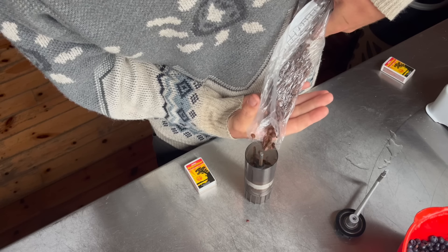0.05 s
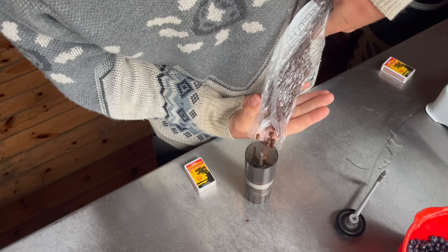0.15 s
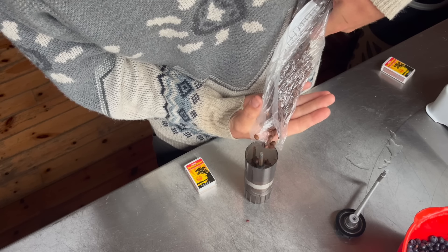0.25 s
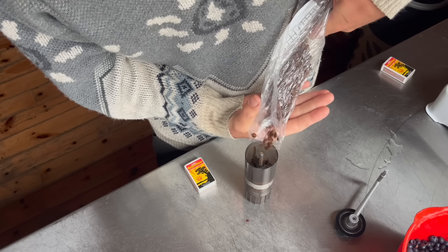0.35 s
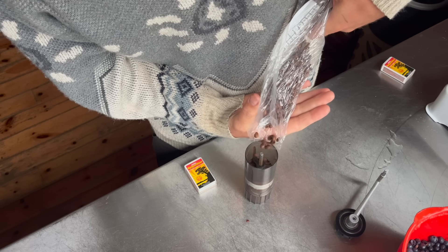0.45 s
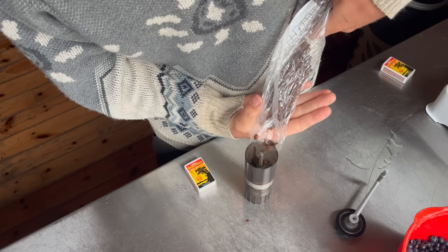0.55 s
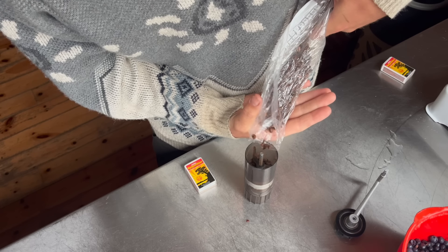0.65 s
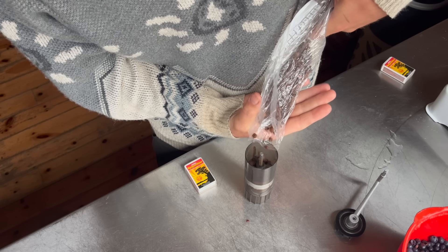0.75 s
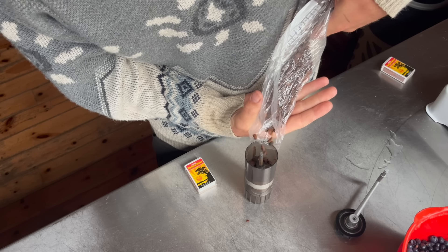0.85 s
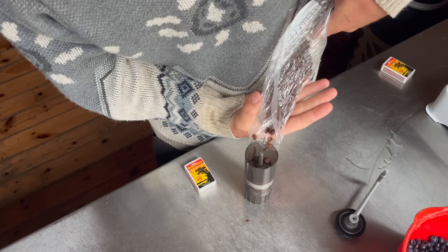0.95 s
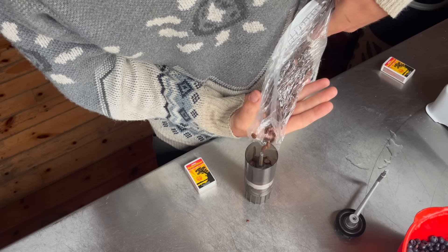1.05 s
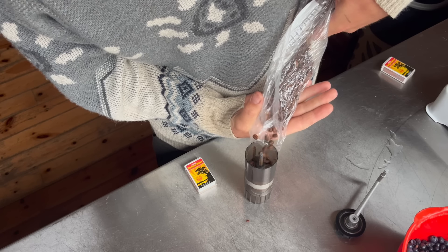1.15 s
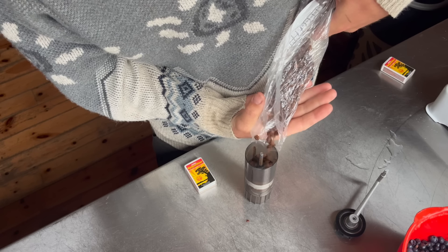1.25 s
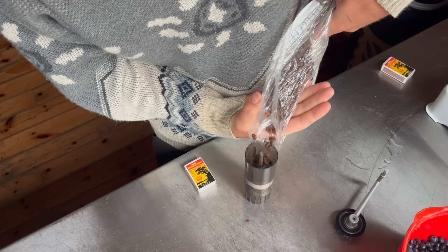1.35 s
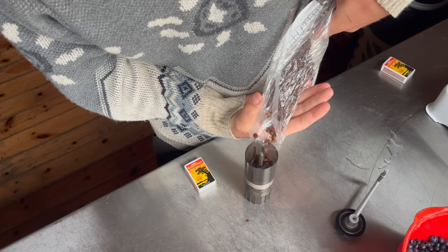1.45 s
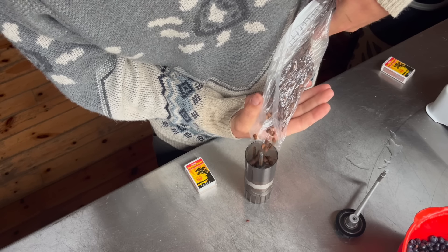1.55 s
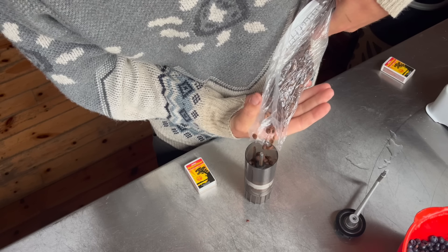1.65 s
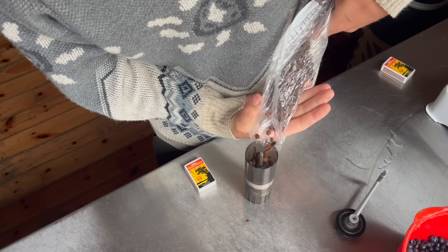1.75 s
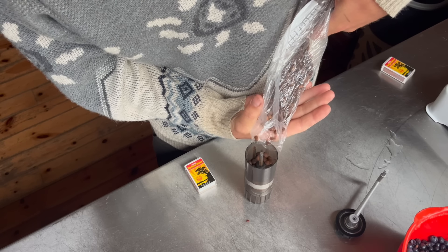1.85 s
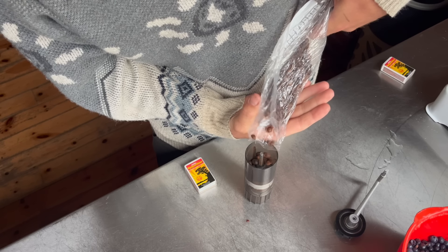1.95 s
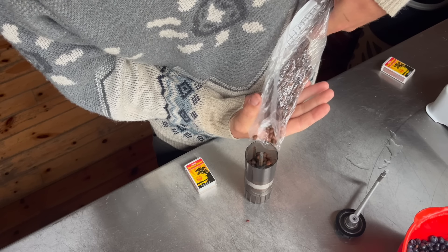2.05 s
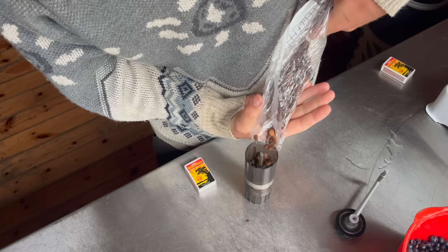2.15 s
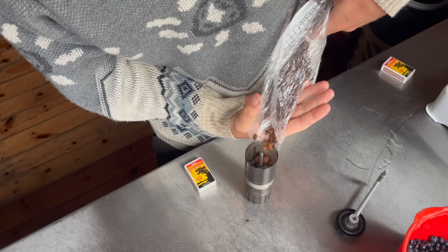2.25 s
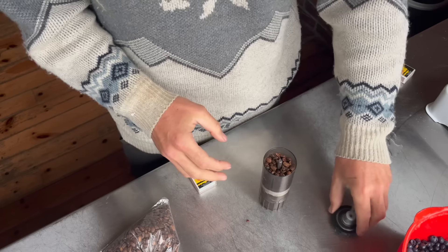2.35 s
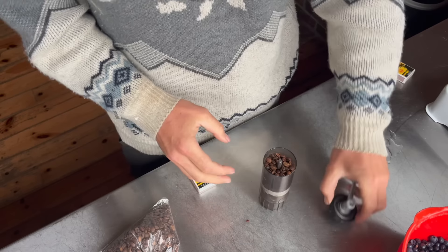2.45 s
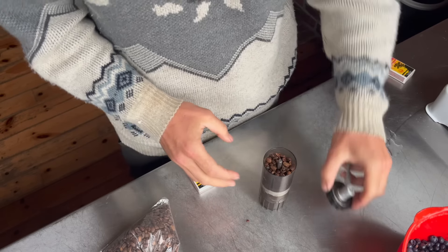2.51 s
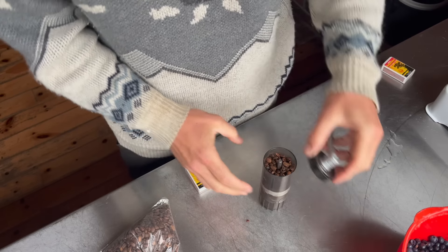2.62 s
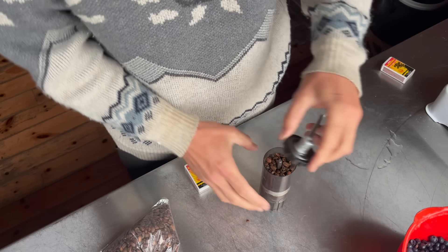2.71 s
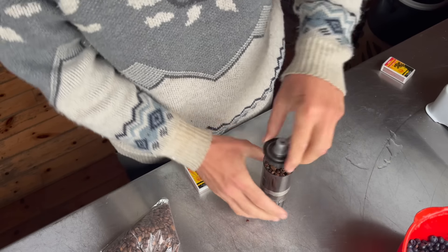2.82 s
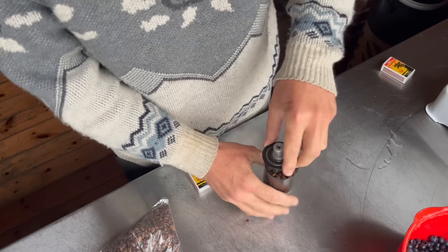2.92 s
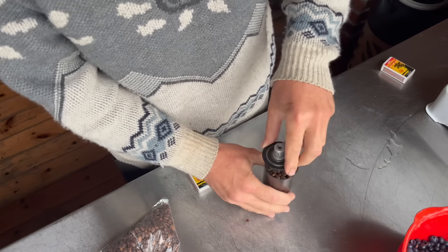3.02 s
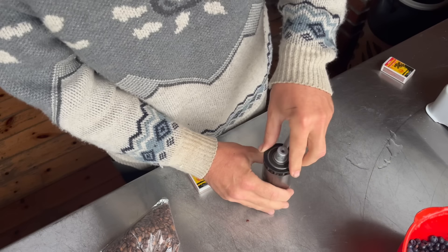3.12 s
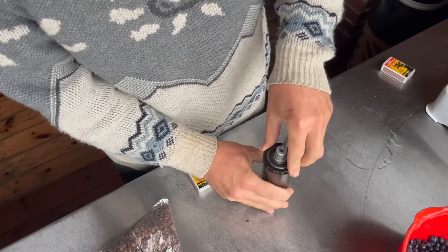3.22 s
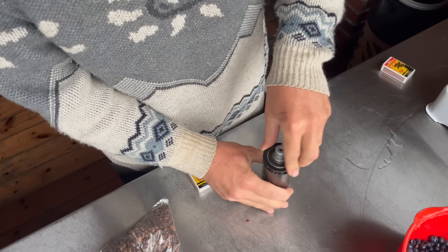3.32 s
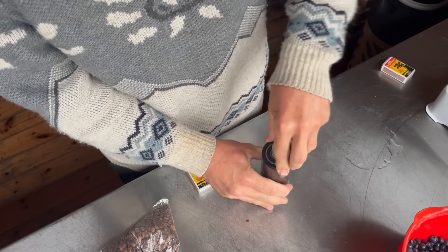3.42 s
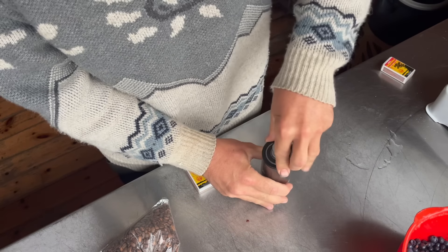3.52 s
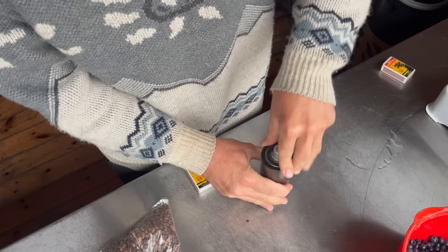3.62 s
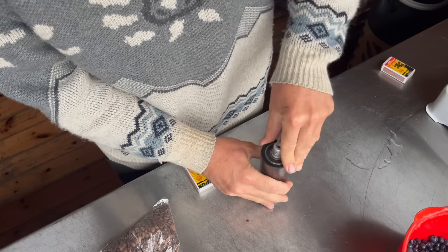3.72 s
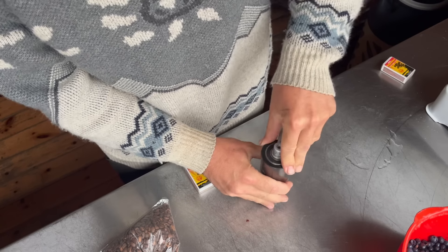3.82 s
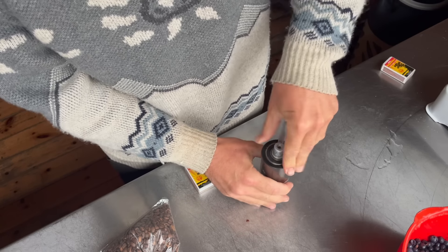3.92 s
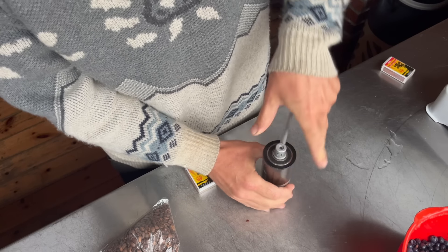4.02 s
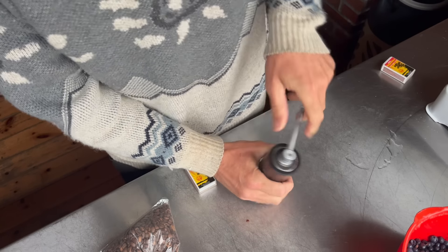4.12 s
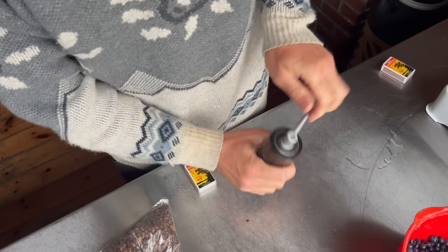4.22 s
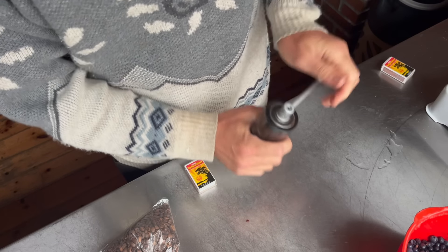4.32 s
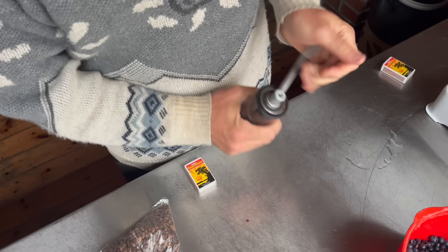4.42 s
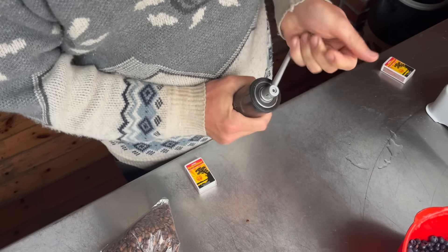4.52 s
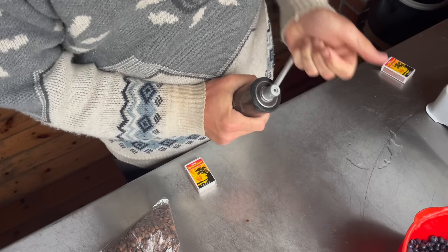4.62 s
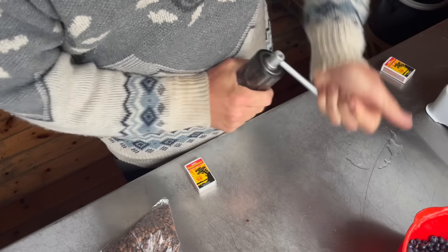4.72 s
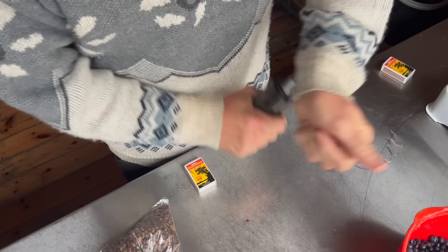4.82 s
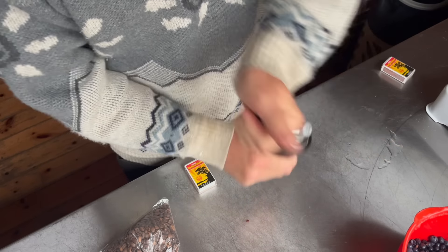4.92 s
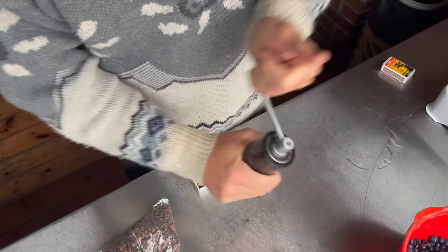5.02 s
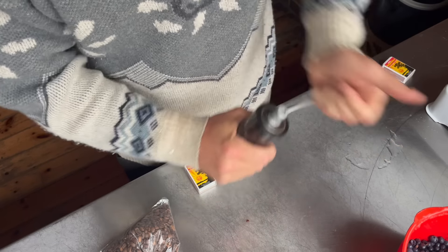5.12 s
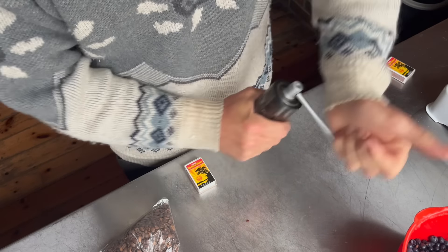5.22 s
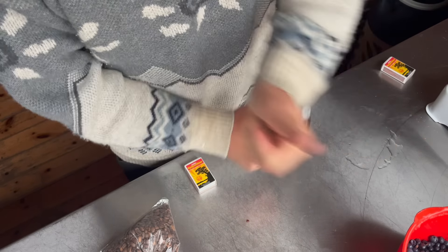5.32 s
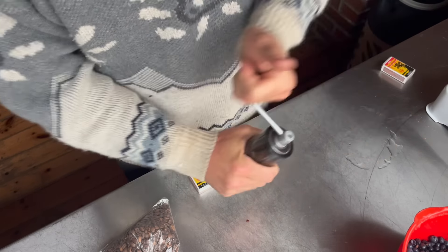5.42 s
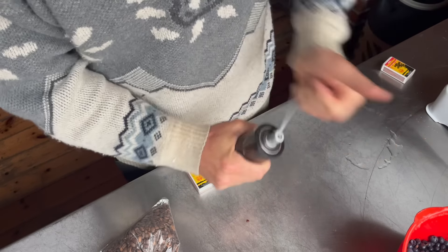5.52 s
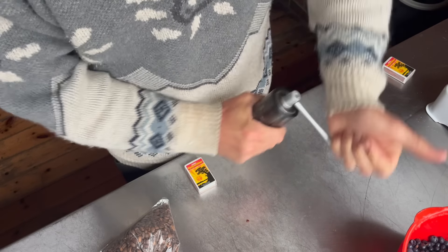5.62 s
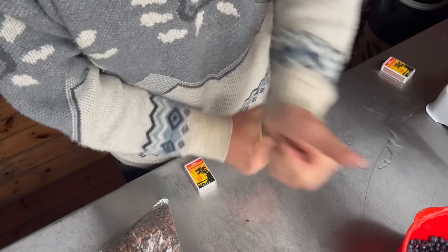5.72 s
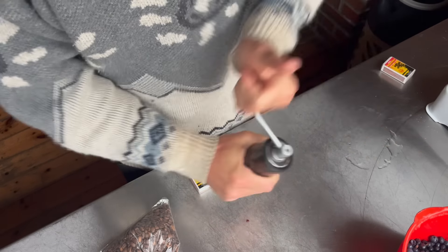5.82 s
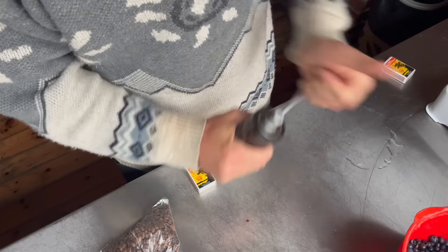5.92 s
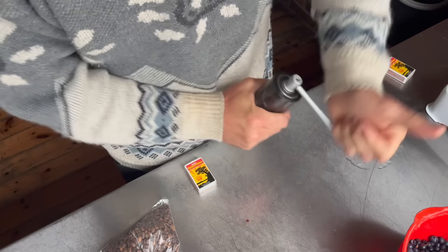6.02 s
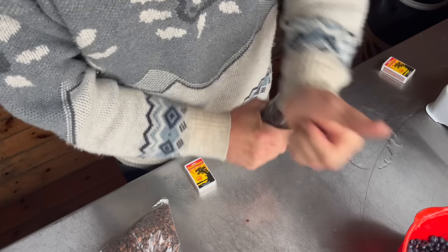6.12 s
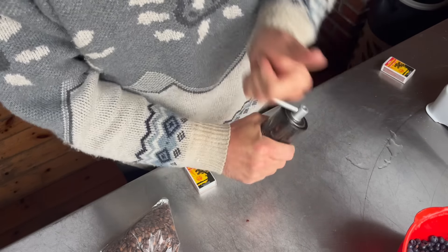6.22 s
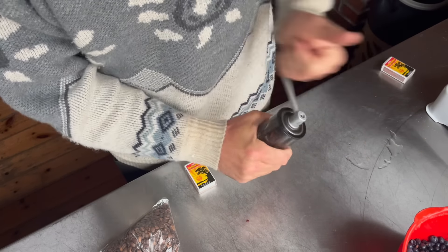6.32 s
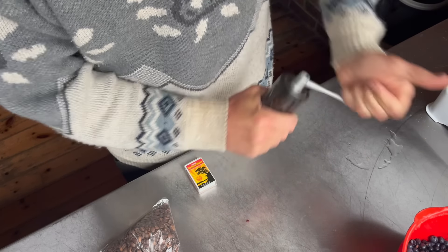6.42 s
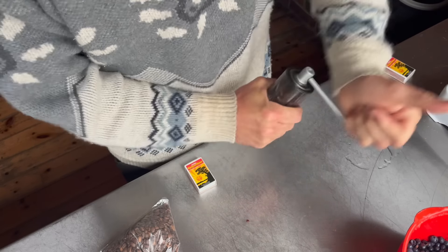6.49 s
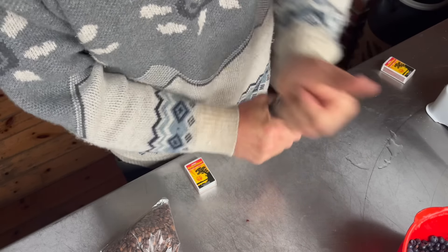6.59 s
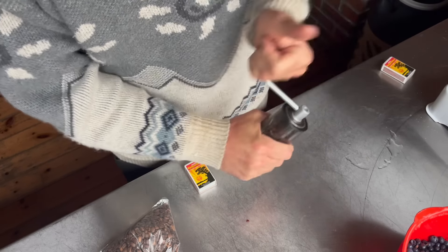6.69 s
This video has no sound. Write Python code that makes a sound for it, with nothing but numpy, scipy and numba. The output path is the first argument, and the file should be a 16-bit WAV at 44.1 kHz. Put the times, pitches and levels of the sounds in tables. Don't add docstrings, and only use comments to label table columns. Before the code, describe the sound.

Close stereo pickup of coffee preparation: dry beans patter and click into a thin metal cylinder, thinning to stray ticks under faint plastic rustle. Then steel taps and hollow thuds as a lid is pressed home over a resonant counter, followed by small clicks of the crank fitting. Finally the crank turns, burrs grinding with gritty rasp, snapping husks and mid-pitched cracks. Faint low room hum and slight hiss throughout.

```python
import sys
import numpy as np
from scipy import signal
from scipy.fft import rfft, irfft
from scipy.io import wavfile
from numba import njit

SR = 44100
rng = np.random.default_rng(int(sys.argv[2]) if len(sys.argv) > 2 else 0)


def digitize_waveform(pressure):
    field = np.atleast_2d(pressure).T
    bounded = np.clip(field, -1, 1)
    quanta = np.round(bounded * 32767).astype(np.int16)
    wavfile.write(sys.argv[1], SR, quanta)


def convert_level_to_amplitude(level_db):
    exponent = np.asarray(level_db, float) / 20
    return 10 ** exponent


N = 297675
T = np.arange(N) / SR
POUR_END_S, GRIND_START_S = 2.362, 4.585

# f/Hz, level/dB per Hz
HUM = [(25, -12), (45, 4.5), (60, -0.5), (110, -2), (170, -14.5), (300, -13), (600, -26.5), (1250, -20),
       (2400, -31.5), (4500, -32.5), (6500, -36), (9500, -37), (12500, -38), (15500, -43)]
HUM_DB = -59.5
# f/Hz, level below the hum/dB
WHINE = [(9900, -30), (4400, -27.5), (5370, -44)]
# f/Hz, t60/s
ROOM = [(150, 0.35), (500, 0.28), (1500, 0.32), (4000, 0.28), (10000, 0.2)]
# f/Hz, level/dB
PORTS = [(60, -17.5), (200, -11.5), (800, -1.5), (1700, -3.5), (2150, -13), (3000, -6), (5000, -4),
         (6700, 5), (8200, -9.5), (9100, -12.5), (10300, -8), (11600, 4), (12900, 17), (14400, -3.5),
         (15600, -15)]
# f/Hz, level/dB
COUNTER_PAN = [(60, -3.5), (110, -3), (200, -8.5), (380, -2.5), (700, -1.5), (1290, -0.5), (2380, 0.0),
               (4400, 3.5), (8120, -0.5), (15000, 0.5)]
# f/Hz, level/dB
HAND_PAN = [(60, -2.5), (110, -3), (200, -2.0), (380, -1), (700, -2), (1290, -1), (2380, 0), (4400, 2),
            (8120, -0.5), (15000, 0)]

# t/s, level/dB
FLOW = [
    (0.0, -48.5),
    (.23, -60),
    (.85, -57.5),
    (.95, -62),
    (1.08, -57.5),
    (1.14, -51),
    (1.55, -63),
    (1.75, -59),
    (2.36, -55.5),
]
# t/s, peak/dB, bean note f/Hz, tube note/dB, wall knock/dB
EARLY_BEANS = [(0.0218, -29, 10200, -47.5, -58), (0.0289, -28.5, 8360, -49, -59),
               (0.0759, -37, 9880, -47, -55), (0.0979, -33, 9240, -54, -52), (0.1054, -42, 9000, -49, -52),
               (0.1349, -34.5, 8050, -57, -62), (0.162, -34, 10100, -57, -59),
               (0.1924, -40, 8480, -63, -63), (0.2001, -38, 8490, -55, -56), (0.2312, -32, 8900, -47, -44),
               (0.2702, -44, 8700, -55, -60), (0.2879, -39, 9900, -45, -59), (0.328, -32.5, 9200, -62, -56),
               (0.3457, -33.5, 11600, -63, -65), (0.3644, -45, 10200, -62, -62),
               (0.395, -34, 9480, -62, -61), (0.4097, -42, 9250, -59, -62), (0.4188, -35, 11300, -65, -59),
               (0.4509, -35.5, 8340, -62, -57), (0.5141, -30.5, 9200, -48, -46),
               (0.5271, -31, 9210, -54, -46), (0.5578, -32, 9900, -45.5, -48),
               (0.5752, -31, 10300, -48, -53), (0.594, -40, 10000, -59, -68), (0.6501, -33, 9350, -60, -53),
               (0.6682, -30.5, 9320, -67, -54), (0.6912, -51, 9060, -64, -69),
               (0.7258, -30, 10900, -58, -65), (0.7407, -37, 9110, -54, -50),
               (0.7641, -30.5, 7700, -48.5, -55), (0.7749, -36, 9500, -61, -59),
               (0.8389, -33, 9600, -60, -57), (0.8753, -29, 8990, -49.5, -58),
               (1.0041, -40.5, 10200, -60, -54), (1.034, -44, 10200, -51.5, -61)]
# t/s, peak/dB, bean note f/Hz, tube note/dB, wall knock/dB
LATE_BEANS = [(1.1263, -30.5, 9200, -54, -50), (1.1496, -28, 7840, -58, -44),
              (1.1773, -24.5, 9400, -65, -49), (1.199, -31, 10200, -60, -52), (1.22, -28, 8050, -45, -52),
              (1.2538, -30, 11100, -58, -50), (1.262, -27, 8840, -61, -54), (1.3033, -43, 10000, -58, -58),
              (1.321, -31, 9240, -53, -58), (1.3398, -29, 8100, -44.5, -53),
              (1.3643, -28.5, 8330, -64, -55), (1.408, -37, 7710, -51, -60), (1.4139, -29, 9490, -48, -56),
              (1.439, -31, 8300, -51, -56), (1.4747, -36, 7860, -52, -56), (1.5083, -41, 9980, -50.5, -53),
              (1.5359, -23, 8000, -39.5, -46), (1.5587, -23.5, 9210, -39, -55),
              (1.638, -38.5, 9070, -56, -60), (1.679, -47, 9810, -56, -63), (1.7068, -39.5, 7490, -64, -61),
              (1.7173, -40, 10100, -61, -62), (1.7868, -37.5, 9300, -62, -62),
              (1.848, -42, 10700, -59, -63), (1.87, -38.5, 9060, -58, -62), (1.9458, -44, 9470, -57, -60),
              (1.9845, -35.5, 7710, -50.5, -54), (2.0054, -31.5, 7820, -58, -57),
              (2.0416, -38.5, 9980, -64, -61), (2.145, -48, 7260, -67, -71),
              (2.1449, -33.5, 9870, -61, -62), (2.2192, -40, 10100, -55, -59),
              (2.2448, -36, 9460, -69, -58), (2.2663, -33, 9100, -49, -56), (2.3171, -34.5, 8100, -51, -61),
              (2.3298, -39.5, 10600, -60, -65)]
# f/bean note, level/dB, t60/s
BEAN_MODES = [(.45, -23, .003), (.58, -16.5, 0.0058), (.85, -1, 0.0021), (1.01, 0.5, 0.0042),
              (1.25, -4.5, 0.0031), (1.55, -13, 0.002)]
# f/Hz, level/dB, t60/s
TUBE = [
    (1425, 0.5, 0.039),
    (3340, -0.5, 0.014),
]
# f/Hz, level/dB per Hz
PATTER = [(150, -23), (420, 1), (950, -2.5), (1430, 2), (1900, -9), (3400, -1.5), (5000, -4), (6500, -3),
          (9000, -4), (11500, -1), (13500, -2.5), (15500, -9.5)]
BAG_DB, BAG_FOLLOWS = -61, 0.26
RATTLE_DB, RATTLE_S = -19.5, 0.014

# t/s, thump/dB, hardness/dB per mode group, crack/dB, ring/dB
BLOWS = [(2.855, -26, -6, -44.5, -53), (2.953, -37, -3, -53, -69), (3.02, -32.5, -5, -58, -68),
         (3.055, -31.5, -4, -53.5, -58), (3.07, -23, -11.5, -47, -50.5), (3.084, -26.5, -26, -68, -67),
         (3.303, -38, 0, -60.5, -45.5), (3.316, -19.5, -14, -36, -41), (3.328, -15, -31, -45, -41.5),
         (3.534, -8, -9.5, -38, -23.5), (3.546, -11, -10, -43, -44), (3.563, -22, -3.5, -32.5, -29),
         (3.574, -19.5, -13.5, -48, -30.5)]
# t/s, level/dB, f/Hz, t60/s
KNOCKS = [(2.856, -39, 693, 0.046), (2.856, -45, 1800, .03), (2.953, -45, 900, .04),
          (3.022, -33, 700, .035), (3.022, -44, 930, .04), (3.058, -35, 720, .035), (3.06, -44, 940, .04),
          (3.316, -32, 950, .025), (3.316, -33, 1200, 0.034), (3.319, -31, 1420, .04),
          (3.33, -27, 370, .08), (3.537, -24, 320, .06), (3.55, -28, 780, 0.047), (3.338, -19, 262, .07),
          (3.54, -23, 540, .06), (3.55, -32.5, 1428, 0.076), (3.572, -21.5, 501, .07),
          (3.576, -20, 260, 0.088)]
# f/Hz, level/dB, t60/s
COUNTER = [(51.9, -11, 0.73), (106, -19, 0.29), (127.5, -13, 0.3), (196, -8.5, 0.18), (256.3, 0.5, 0.11),
           (304, -8, 0.27), (375, -4.5, .15), (440, -7.5, 0.18), (486, -9.5, 0.24), (550, -15.5, 0.42),
           (638, -4, 0.09), (705, -1, 0.061), (749, -9.5, 0.1), (856, -11, 0.11), (957, -13.5, 0.083),
           (1060, -15, 0.098), (1162, -12.5, 0.041), (1300, -18, 0.28), (1420, -16.5, 0.13),
           (1479, -12, 0.046), (1772, -28, 0.11)]
# f/Hz, level/dB, t60/s
LEGS = [(49.2, -17, 0.9), (375, -24, 0.97), (389, -27.5, 1)]
DAMPED_S = [0.16, .08]
# f/Hz, level/dB per Hz
CRACK = [(900, -7), (1400, -3.5), (2000, -9), (3000, -6.5), (4500, -8), (6500, -13), (8200, -15),
         (9700, -18.5), (11500, -23.5), (13500, -20.5), (15500, -21.5)]
# t/s, crack/dB, ring/dB
TICKS = [
    (4.004, -68, -79),
    (4.058, -56, -47),
    (4.063, -56, -50),
    (4.1397, -39, -33.5),
    (4.27, -68, -75),
    (4.365, -64, -71),
    (4.436, -70, -55),
    (4.454, -64, -60),
    (4.547, -67, -54),
]
# middle t/s, half length/s, finger rub/dB, counter rumble/dB
SHIFTS = [
    (3.042, 0.049, -62.5, -45.5),
    (3.311, .011, -52, -44),
    (3.362, 0.053, -68, -47),
    (3.621, 0.11, -70, -47),
    (3.897, 0.079, -74.5, -62.5),
    (4.098, 0.09, -67.5, -65),
    (4.45, 0.11, -67.5, -88),
]
TICK_THUMP_DB, TICK_FOLLOWS, TICK_HARD_DB = -56, 0.55, -12
BLOW_S, TICK_S = 0.0024, 0.00057
LID_SEATED_S, LOOSE_LID_DB = 3.2, -0.5
SPOT_DETUNE = .014
SOFT_BASS = 0.18
RUB_REST_DB = -81

# t/s, crunch/dB, body f/Hz
CRANK = [(4.585, -43.5, 1390), (4.63, -34.5, 1440), (4.72, -38, 1470), (4.82, -39.5, 1690),
         (4.935, -43, 1490), (4.95, -37, 1310), (5.03, -40.5, 1420), (5.14, -39, 1590), (5.38, -41.5, 1520),
         (5.52, -34, 1730), (5.58, -38.5, 1600), (5.62, -41.5, 1430), (5.77, -42, 1400),
         (5.92, -42.5, 1280), (6.05, -41, 1640), (6.35, -39.5, 1350), (6.66, -40, 1590),
         (6.75, -38.5, 1790)]
# t/s, peak/dB, body f/Hz
BREAKS = [(4.587, -34, 1340), (4.609, -28.5, 2420), (4.61, -26.5, 1310), (4.651, -24, 1350),
          (4.66, -22, 1330), (4.72, -28, 1470), (4.747, -33.5, 1440), (4.766, -23.5, 1390),
          (4.816, -24.5, 1660), (4.946, -29, 2090), (4.96, -27.5, 1550), (4.974, -23, 1260),
          (5.057, -24.5, 1420), (5.133, -23, 1450), (5.169, -29, 2060), (5.205, -31, 1380),
          (5.298, -31.5, 1470), (5.308, -32.5, 920), (5.35, -26.5, 2080), (5.385, -32, 2400),
          (5.386, -31, 1390), (5.421, -32, 1300), (5.458, -29, 1590), (5.5, -25.5, 1520),
          (5.56, -24.5, 1430), (5.606, -17.5, 1410), (5.632, -27.5, 1490), (5.65, -23, 2150),
          (5.674, -32, 1610), (5.696, -31.5, 1620), (5.752, -30, 1540), (5.787, -32.5, 1330),
          (5.821, -31, 1146), (5.83, -29, 1070), (5.876, -27, 890), (5.893, -24, 950), (5.926, -27, 1440),
          (5.943, -29.5, 1380), (6.007, -25.5, 2060), (6.015, -24, 2140), (6.033, -33, 2020),
          (6.055, -17, 2120), (6.08, -24, 1490), (6.116, -32, 1430), (6.148, -34.5, 2080),
          (6.173, -29.5, 1530), (6.186, -26, 1630), (6.196, -28.5, 2100), (6.245, -30, 1620),
          (6.298, -27.5, 2170), (6.366, -31, 861), (6.377, -35, 1420), (6.457, -32, 1380),
          (6.496, -29.5, 2150), (6.549, -29.5, 923), (6.567, -30, 1340), (6.585, -31, 864),
          (6.636, -33, 2110), (6.709, -30, 1880), (6.731, -28.5, 1610)]
# t/s, peak/dB
SNAPS = [(4.592, -46), (4.6097, -43), (4.6585, -48), (4.6845, -38), (4.7651, -41), (4.861, -42),
         (4.936, -45), (4.9455, -34), (4.9652, -36), (4.995, -34), (5.058, -35.5), (5.1342, -31),
         (5.185, -37.5), (5.424, -34), (5.434, -37), (5.5963, -30.5), (5.6505, -41), (5.763, -37.5),
         (5.7736, -36.5), (5.79, -38.5), (5.892, -37), (5.9047, -38), (5.937, -40), (5.9552, -36),
         (5.9654, -35), (6.022, -46), (6.0536, -38), (6.2891, -34), (6.4147, -41), (6.4742, -63)]
# middle t/s, half length/s, thud/dB
JAMS = [
    (5.156, 0.08, -44.5),
    (5.6, 0.051, -43.5),
    (5.705, 0.069, -50),
    (5.922, 0.1, -45),
    (6.253, 0.13, -48.5),
    (6.557, 0.12, -50),
    (6.75, 0.045, -46),
]
# f/Hz, level/dB per Hz
BURR = [(2000, -2.5), (2600, -5), (3700, -8.5), (4700, -6), (5500, -12), (6600, -17.5), (8000, -22.5),
        (10000, -22), (11500, -20.5), (13500, -32), (15500, -41)]
# f/Hz, level/dB, width/Hz
BODY = [(900, -5.5, 220), (1400, -3, 250), (2102, -4.5, 230), (4520, -15.5, 290)]
GRIT_DB, GRIT_FOLLOWS = -50.5, 0.96
THUD_REST_DB = -21.5
CRUMBLE_DB, CRUMBLE_S = -14, 0.011


def unit(x):
    return x / np.sqrt(np.mean(x ** 2))


def curves(table):
    s, *columns = np.transpose(table)
    return [np.interp(T, s, column) for column in columns]


def gain(points, size):
    hz, db = np.transpose(points)
    return convert_level_to_amplitude(np.interp(np.log(np.fft.rfftfreq(size, 1 / SR) + 1), np.log(hz), db))


def colour(x, points):
    cepstrum = irfft(np.log(gain(points, size=4096)))
    cepstrum[1:2048] *= 2
    cepstrum[2049:] = 0
    response = irfft(np.exp(rfft(cepstrum)))
    return signal.fftconvolve(x, response)[:len(x)]


def band(x, lo_hz, hi_hz):
    return signal.sosfilt(signal.butter(2, [lo_hz, hi_hz], "bandpass", fs=SR, output="sos"), x)


def hiss():
    return rng.standard_normal(N)


def ring(hz, db, t60, size=2048):
    t = np.arange(size)[:, None] / SR
    modes = np.sin(2 * np.pi * hz * t) * 1000. ** (-t / t60)
    return (convert_level_to_amplitude(db) * modes).sum(axis=1)


def scuff(noise, ms):
    x = noise * np.exp(-np.arange(len(noise)) * 1000 / SR / ms)
    return x / np.sqrt(np.sum(x ** 2))


def add(out, s, x):
    i = int(s * SR)
    out[i:i + len(x)] += x[:N - i]


def clicks(per_s, spread_db):
    chance, sign, size = rng.random((3, N))
    hit = chance < per_s / SR
    return unit(hit * np.sign(sign - .5) * convert_level_to_amplitude(-spread_db * np.log(size + .02)))


def swells(middle_s, half_s, db):
    return convert_level_to_amplitude(db) @ np.exp(-((T - middle_s[:, None]) / half_s[:, None]) ** 2)


def aftermath(hits, db, decay_s):
    late = T - np.array([h[0] for h in hits])[:, None]
    peaks = convert_level_to_amplitude(np.array([h[1] for h in hits]) + db)
    return peaks @ ((late > 0) * np.exp(-np.abs(late) / decay_s))


@njit
def moving_band(x, hz, width):
    y, b, l = np.empty(len(x)), 0., 0.
    for i in range(len(x)):
        g, k = np.tan(np.pi * hz[i] / SR), width / hz[i]
        v = (b + g * (x[i] - l)) / (1 + g * (g + k))
        b, l, y[i] = 2 * v - b, l + 2 * g * v, k * v
    return y


def ports(mid, side, pan):
    ratio, lean = gain(PORTS, size=N + 1), np.sqrt(gain(pan, size=N + 1))
    share = 1 / np.sqrt(1 + ratio ** 2)
    left = (mid + ratio * side) * lean
    right = (mid - ratio * side) / lean
    return irfft(share * np.array([left, right]))[:, :N]


def echo():
    t = np.arange(SR // 2) / SR
    tail = np.zeros(len(t))
    for hz, t60 in ROOM:
        tail += band(rng.standard_normal(len(t)), hz / 1.65, hz * 1.86) * 1000. ** (-t / t60)
    tail *= np.clip((t - .002) / 0.0014, 0, 1)
    return tail / np.sqrt(np.sum(tail ** 2))


def place(x, pan, wet_db):
    direct = rfft(x, N + 1)
    wet = [convert_level_to_amplitude(wet_db) * rfft(signal.fftconvolve(x, echo())[:N], N + 1) for _ in range(2)]
    return ports(direct + wet[0], wet[1] - 1j * direct, pan)


def kitchen():
    air = [unit(colour(hiss(), HUM)) for _ in range(2)]
    for hz, db in WHINE:
        air[0] += convert_level_to_amplitude(db) * unit(band(hiss(), hz - 30, hz + 30))
    mid, side = convert_level_to_amplitude(HUM_DB) * rfft(air, N + 1)
    return ports(mid, convert_level_to_amplitude(3.5) * side, HAND_PAN)


def pour():
    out = np.zeros(N)
    tube_hz, tube_db, tube_t60 = np.transpose(TUBE)
    share, bean_db, bean_t60 = np.transpose(BEAN_MODES)
    drops = list(EARLY_BEANS) + list(LATE_BEANS)
    chance = rng.standard_normal((len(drops), 2, len(share)))
    contact = rng.standard_normal((len(drops), 256))
    for (s, peak_db, note_hz, *wall_db), (detune, uneven), noise in zip(drops, chance, contact):
        bean_hz = np.minimum(note_hz * share * (1 + 0.033 * detune), .45 * SR)
        tick = ring(bean_hz, bean_db + 2.6 * uneven, bean_t60, size=512)
        tick = np.convolve(tick, scuff(noise, ms=1.32))
        add(out, s, convert_level_to_amplitude(peak_db + 2.0) * tick / np.abs(tick).max())
        wall = ring(tube_hz * (1 + 0.016 * detune[:2]), tube_db + wall_db, tube_t60)
        add(out, s, convert_level_to_amplitude(8.0) * wall)
    out = band(out, 1450, 22000)

    flow_db, = curves(FLOW)
    patter = unit(colour(clicks(1500, 2.7) + 0.68 * hiss(), PATTER))
    out += (convert_level_to_amplitude(flow_db) + aftermath(drops, RATTLE_DB, RATTLE_S)) * patter
    crumple = convert_level_to_amplitude(2.5 * unit(band(hiss(), 1.0, 13.4)))
    rustle = unit(band(clicks(600, 0.97), 292, 760)) * crumple
    out += convert_level_to_amplitude(BAG_DB + BAG_FOLLOWS * (flow_db + 57)) * rustle
    return place(out, HAND_PAN, wet_db=-9.0) * np.clip((POUR_END_S - T) / 0.0085, 0, 1)


def counter_modes():
    hz, db, t60 = np.transpose(COUNTER)
    t60 = np.minimum(t60, np.take(DAMPED_S, hz > 800))
    return np.hstack([[hz, db, t60], np.transpose(LEGS)])


def hands():
    middle_s, half_s, rub_db, counter_db = np.transpose(SHIFTS)
    rub_level = convert_level_to_amplitude(7.0) * (convert_level_to_amplitude(RUB_REST_DB) + swells(middle_s, half_s, rub_db))
    rub = rub_level * (clicks(2000, 1.8) + hiss())
    rub = rub + convert_level_to_amplitude(-7.5) * band(rub, 7000, 14000)
    rumble = unit(band(hiss(), 250, 760)) + convert_level_to_amplitude(-3.0) * unit(band(hiss(), 71, 170))
    return rub * (T > BLOWS[0][0]), swells(middle_s, half_s, counter_db) * rumble


def lid():
    out, cracks, rings = np.zeros((3, N))
    hz, db, t60 = counter_modes()
    group = np.searchsorted([430, 800], hz)
    sway = (-1) ** np.arange(len(hz)) * convert_level_to_amplitude(db - np.array([2, -6, -15])[group])
    blows = list(BLOWS)
    for s, crack_db, ring_db in TICKS:
        thump_db = TICK_THUMP_DB + TICK_FOLLOWS * (crack_db + 53.0)
        blows.append((s, thump_db, TICK_HARD_DB, crack_db, ring_db))
    t = np.arange(16384) / SR
    burst_t = t[:4096]
    rise = 1 - np.exp(-np.outer(t, hz) / 0.24)
    deep = np.abs(hz - 130) < 40
    fizz = rng.standard_normal((len(blows), 4096))
    spots = rng.standard_normal((len(blows), 2, len(hz)))
    for (s, thump_db, hard_db, crack_db, ring_db), noise, (detune, uneven) in zip(blows, fizz, spots):
        modes = np.sin(2 * np.pi * np.outer(t, hz * (1 + SPOT_DETUNE * detune)))
        modes *= 1000. ** (-t[:, None] / (0.68 * t60))
        mode_db = thump_db + hard_db * group - SOFT_BASS * hard_db * deep + 1.5 * uneven - 4.5
        mode_db += LOOSE_LID_DB * (group == 1) * (s < LID_SEATED_S)
        add(out, s, (modes * rise) @ (sway * convert_level_to_amplitude(mode_db)))

        is_tick = s >= TICKS[0][0]
        crack_s = TICK_S if is_tick else BLOW_S
        sharp = np.sqrt(BLOW_S / crack_s) * np.exp(-burst_t / crack_s)
        burst = noise * (sharp + 0.049 * np.exp(-burst_t / 0.0055))
        add(cracks, s, convert_level_to_amplitude(crack_db + 19.5) * (1.7 * np.diff(burst) if is_tick else burst))
        add(rings, s, convert_level_to_amplitude(ring_db + 24) * burst)
    for s, knock_db, knock_hz, knock_t60 in KNOCKS:
        add(out, s, ring(knock_hz, knock_db, knock_t60, size=8192))

    rub, rumble = hands()
    steel = band(band(cracks, 1100, 5300), 900, 6600)
    steel += band(rings, 8700, 14600) + convert_level_to_amplitude(1.0) * band(rings, 9420, 10350)
    out += colour(steel + rub, CRACK) + rumble
    return place(out, COUNTER_PAN, wet_db=-4.0) * (T < GRIND_START_S)


def crush():
    crunch_db, body_hz = curves(CRANK)
    taps, shards = clicks(900, 4.1), aftermath(BREAKS, CRUMBLE_DB, CRUMBLE_S)
    steel = np.zeros(N)
    for hz, db, width in BODY:
        steel += convert_level_to_amplitude(db) * unit(band(clicks(900, 3.2), hz - width / 2, hz + width / 2))
    body = unit(moving_band(moving_band(taps, body_hz, 690.0), body_hz, 1060.0))
    body += 0.72 * unit(band(clicks(900, 3.6), 750, 2930)) + 0.54 * steel
    thud = unit(band(band(clicks(300, 2.1), 320, 1440), 335, 1300))
    grit = unit(band(colour(0.58 * taps + clicks(3000, 3.5), BURR), 2400, 14700))
    out = (convert_level_to_amplitude(crunch_db - 4.5) + convert_level_to_amplitude(-4.0) * shards) * unit(body)
    out += (convert_level_to_amplitude(GRIT_DB + GRIT_FOLLOWS * (crunch_db + 40.5)) + convert_level_to_amplitude(-8.0) * shards) * grit
    out += (convert_level_to_amplitude(crunch_db + THUD_REST_DB) + swells(*np.transpose(JAMS))) * thud
    return out * convert_level_to_amplitude(1.8 * unit(band(clicks(60, 3.5), 10.0, 70)))


def break_beans(out):
    share, db = np.array([.62, 1.001, 1.5]), np.array([-8.0, 0.5, -3.0])
    t60 = np.array([.004, .024, .0025])
    for (s, peak_db, hz), noise in zip(BREAKS, rng.standard_normal((len(BREAKS), 1024))):
        snap = np.convolve(ring(hz * share, db, t60, size=1024), scuff(noise, ms=3.2))
        add(out, s, convert_level_to_amplitude(peak_db - 3.0) * snap / np.abs(snap).max())


def snap_husks():
    husks = np.zeros(N)
    for (s, peak_db), noise in zip(SNAPS, rng.standard_normal((len(SNAPS), 512))):
        add(husks, s, convert_level_to_amplitude(peak_db + 20.5) * scuff(noise, ms=5.3))
    return band(husks, 2700, 11000)


def grind():
    out = crush()
    break_beans(out)
    out = band(out, 250, 22000)
    out += snap_husks()
    return place(out * (T > GRIND_START_S), HAND_PAN, wet_db=-6)


def scene():
    return kitchen() + pour() + lid() + grind()


def band_limit(x):
    return signal.sosfilt(signal.butter(12, 17150, fs=SR, output="sos"), x)


def record(dry):
    top = signal.ellip(8, .2, 60, 15880, fs=SR, output="sos")
    return band_limit(signal.sosfilt(top, dry))


dry = scene()
out = record(dry)
digitize_waveform(out)
```